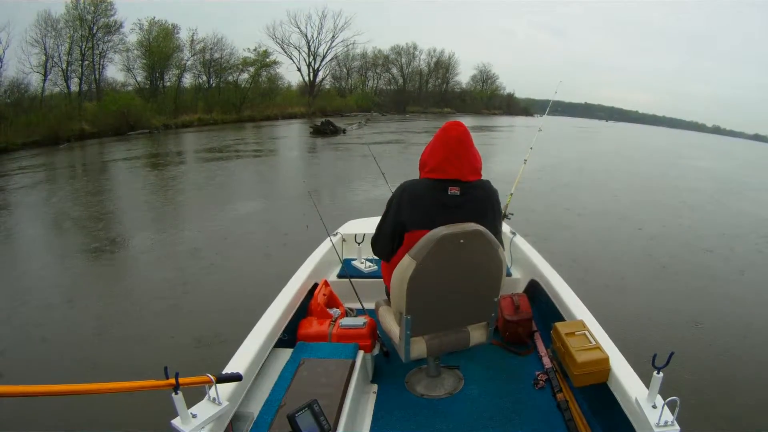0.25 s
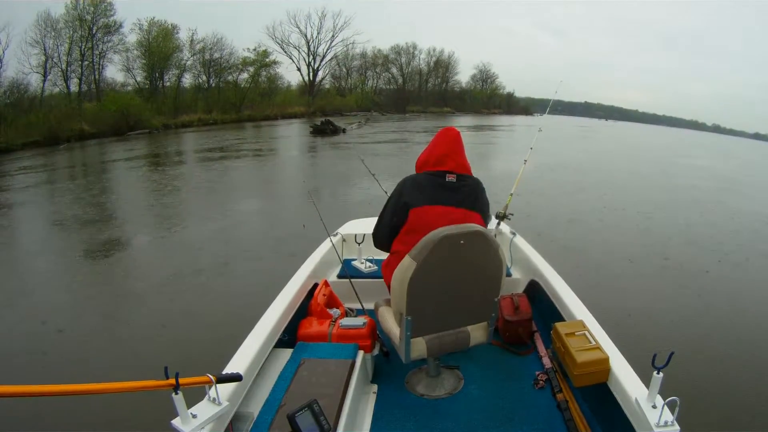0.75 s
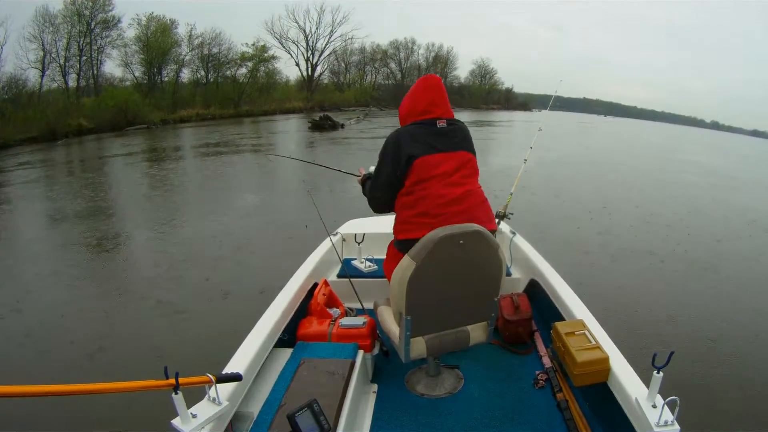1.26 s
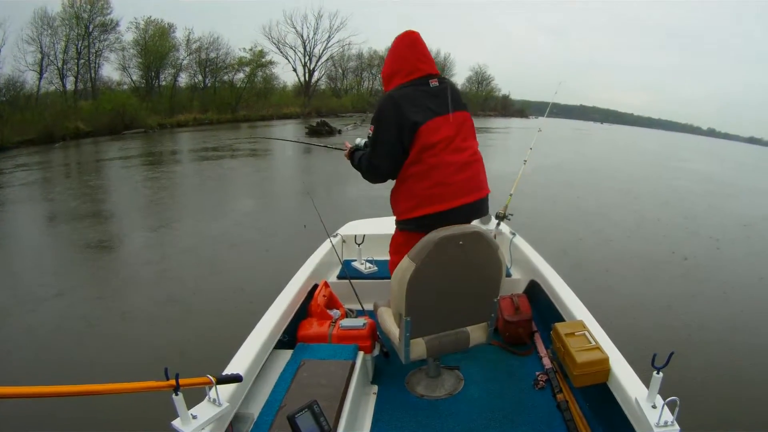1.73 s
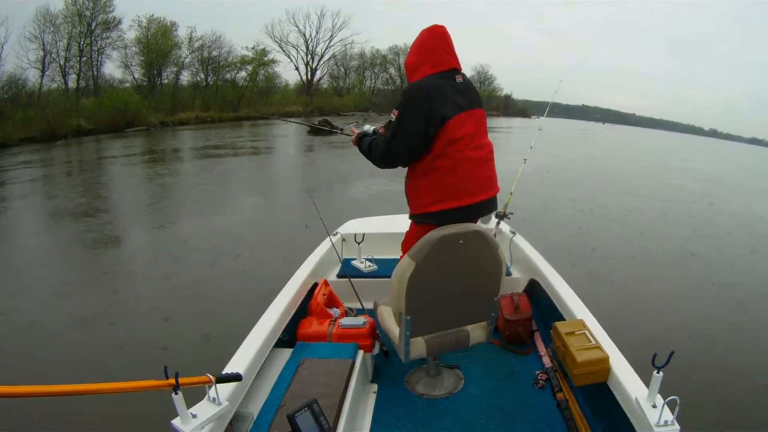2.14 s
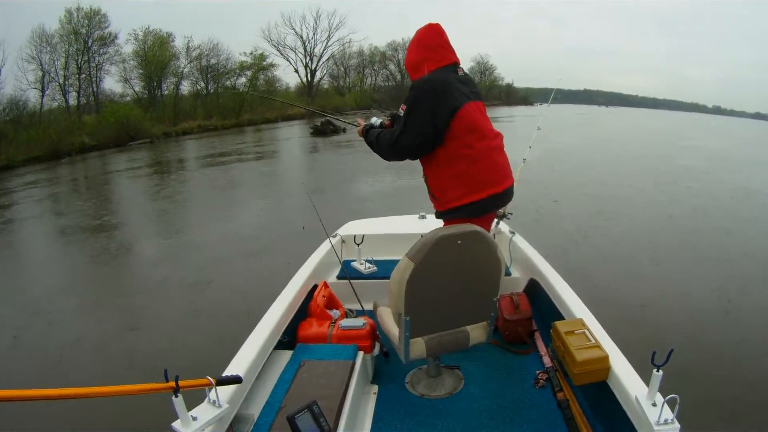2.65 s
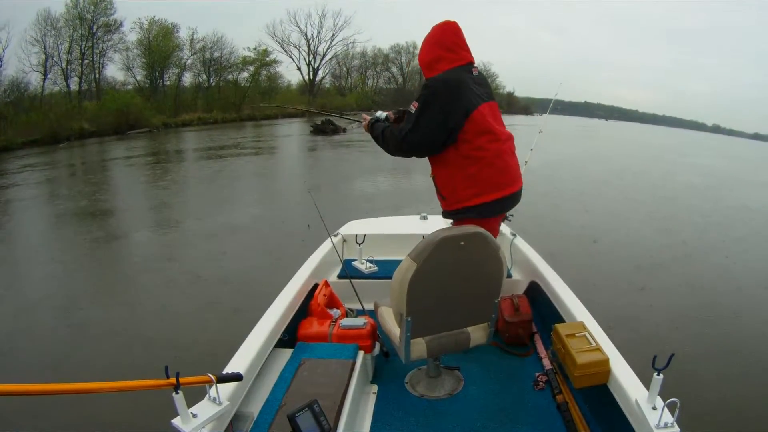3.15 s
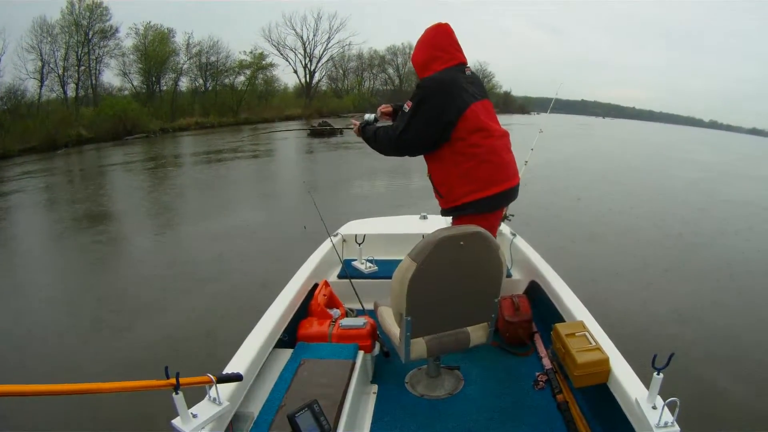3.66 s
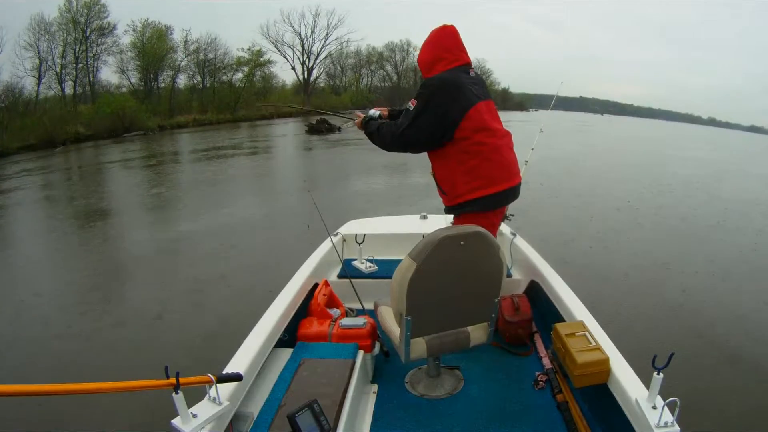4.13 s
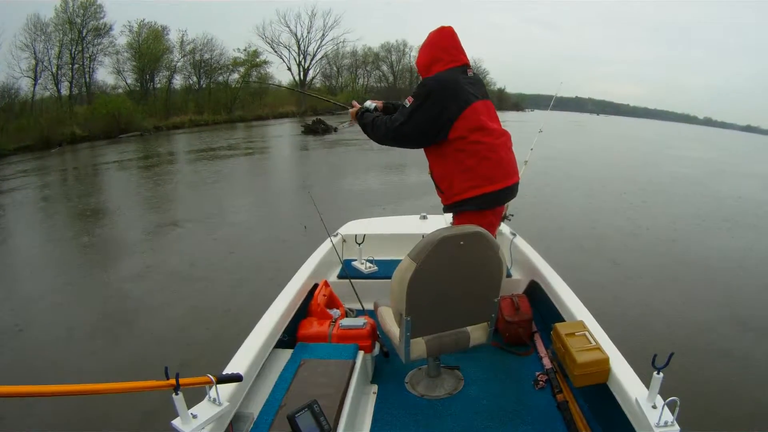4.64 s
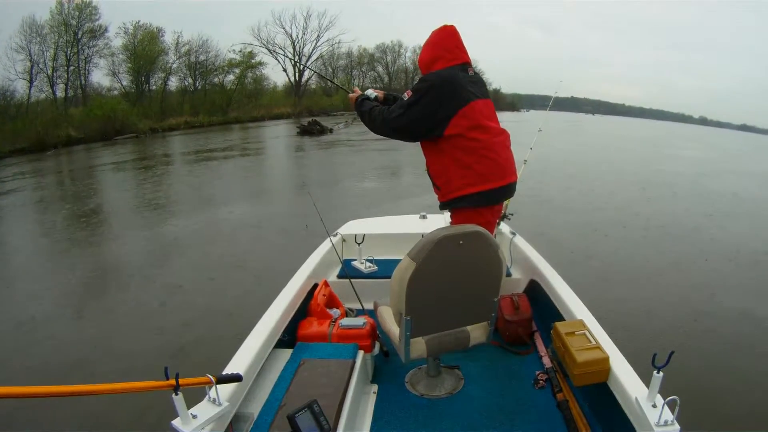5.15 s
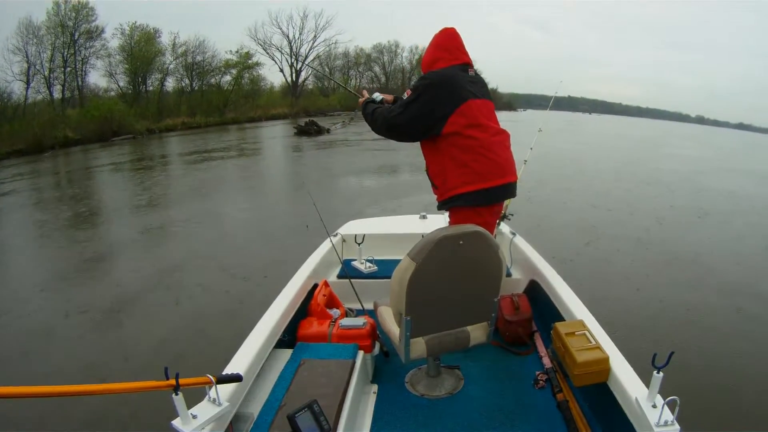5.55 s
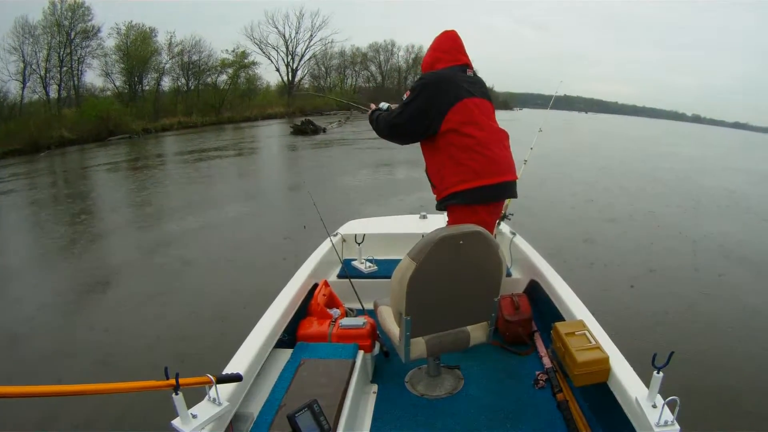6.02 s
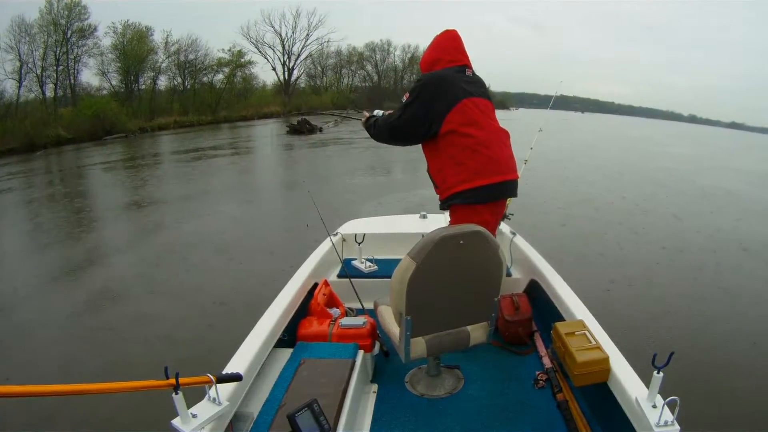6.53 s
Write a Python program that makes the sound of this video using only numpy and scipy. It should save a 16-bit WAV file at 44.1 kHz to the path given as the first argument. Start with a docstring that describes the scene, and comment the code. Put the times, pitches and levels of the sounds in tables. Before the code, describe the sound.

Steady rain on open water and a small boat, heard through a hard plastic camera housing. Low hull drumming and river hiss run throughout under a thin, rapidly pulsing whine. Drops smack the casing, tick on gear and plink in the water. An angler rises with dull bumps near one second; one violent smack follows, then a tiny squeak, a line swish and a fading electronic chirr.

```python
"""Steady rain on a river, heard from a camera in a plastic housing on a small open boat.
Throughout, filtered noise makes the boat drum and the water hiss, while the camera whines in bursts.
Single drops excite modes of the housing, tick on the gear or leave ringing bubbles in the river.
Soon an angler stands up with a few dull bumps; later come a thin squeak and the swish of a cast line.
Then a slowly fading electronic chirr sets in and lasts to the end."""
import sys
import numpy as np
from scipy import signal
from scipy.fft import rfft, irfft
from scipy.io import wavfile
from scipy.ndimage import uniform_filter1d

SR = 44100
rng = np.random.default_rng(int(sys.argv[2]) if len(sys.argv) > 2 else 0)


def wav_out(sig):
    """Save sig, one row per channel (or a flat mono array), as 16-bit PCM at SR to the path in sys.argv[1]."""
    wavfile.write(sys.argv[1], SR, np.round(np.clip(np.atleast_2d(sig).T, -1, 1) * 32767).astype(np.int16))


N = 299426
TIME = np.arange(N) / SR   # seconds

# Drumming of rain on the boat. Each row: time in seconds, level in dB before the overall trim.
DRUMMING_LEVEL = [(1.6, -33), (3.67, -35), (4.08, -33), (4.69, -36), (5.1, -32.5), (5.7, -36), (6.08, -31),
                  (6.79, -36)]
# Spectrum of the drumming boat. Each row: frequency in Hz, relative density in dB.
DRUM_SPECTRUM = [(25, -41.5), (80, -35.5), (115, -35), (160, -22), (210, -15.5), (265, -9.5), (300, -9),
                 (335, 0), (380, 2), (415, -1.5), (470, -8), (600, -15), (900, -24.5), (2000, -101)]
# Spectrum of rain on open water. Each row: frequency in Hz, relative density in dB.
RIVER_SPECTRUM = [(100, -18), (450, 2.5), (750, 3.5), (1200, 3.5), (1720, 2.5), (1820, 10.5), (1920, -0.5),
                  (2080, 5), (2450, -2), (2950, -3), (4100, -7.5), (4500, -5.5), (6300, -10), (8100, -9),
                  (8350, -37), (8700, -76)]
# Narrow hull resonances kept humming by the rain. Each row: frequency in Hz, rms level in dB
# before the band filter.
HULL_MODES = [(131, -67), (150, -63.5), (206, -54), (228, -63.5), (290, -47.5), (332, -51.5), (366, -50),
              (400, -53), (413, -47), (444, -51)]
# Modes of the housing. Each row: frequency in Hz, relative strength in dB, 60 dB decay time in seconds.
HOUSING_MODES = [(723, -16, 0.025), (960, -4.5, 0.026), (1167, -2.5, 0.018), (1538, 0.5, 0.0095),
                 (1817, -6.5, 0.025), (2025, 3, 0.012), (2584, 3.5, 0.0092), (3050, 4, 0.011),
                 (4245, -5, 0.014), (4614, -4, 0.013), (5300, 0.5, 0.0061), (6050, -9.5, 0.0096),
                 (6850, -5.5, 0.0069), (11160, -18, 0.015)]
# The loudest drops and their splashes. Each row: start in seconds, peak in dB before limiting,
# ring of the struck spot in Hz, its added strength in dB, pitch that the spot cannot excite in Hz,
# then the gains in dB of the low, middle, high and top modes.
LOUD_DROPS = [(0.0788, -11.5, 1930, 16, 1570, 7, 5, 4, 10), (0.4621, -17.5, 2680, 11, 3500, 5, -1, 4, 3),
              (0.4774, -18.5, 2090, 10, 3630, -5, -5, 3, 3),
              (.517, -20.5, 1060, -13, 3700, 7.5, -8, -2, -4),
              (.7480, -26, 1530, 8, 3500, 6, -10, -8.5, -8),
              (1.3325, 22.5, 1110, -2, 3880, -6, -2, -5, -8.5),
              (2.6958, -25, 1380, 8, 2200, 2, -2, -12, -18), (2.7018, -17.5, 3050, 8, 2010, 1, 0, -3, -16),
              (2.7074, -10.5, 740, 16, 3600, -3, -6, -5.5, -14),
              (3.0430, -16, 730, 17, 2500, 0, 3.5, 8, -17), (4.502, -16.5, 1570, 12, 2000, -6, 3, 1, 0),
              (4.572, -4.5, 5590, 5.5, 3400, -2.5, -14, 8.5, -10),
              (4.6351, -2, 755, 14.5, 5130, -6, -6, 1.5, 7),
              (5.1001, -4.5, 2500, -3, 3620, -6.5, -3, 1, 7.5),
              (6.5322, 7.5, 2660, 10, 2100, 2.5, -1.5, 2.5, 1),
              (6.6834, -15.5, 1460, 7, 2140, -7, -1, -5.5, -10)]
# Thuds of a boat panel. Each row: start in seconds, level in dB, frequency it settles to in Hz,
# octaves higher at the start.
PANEL_THUDS = [(.078, -26, 542, 0.89), (.4645, -33, 377, 0.86), (.5185, -36, 510, 0.96),
               (2.7105, -21, 440, 1.3), (3.0448, -23.5, 400, 1.53), (6.6868, -20, 374, 2)]
# Bubbles left by drops in the river. Each row: start in seconds, level in dB before the bubble and
# splash offsets, starting frequency in Hz, swell in seconds.
RIVER_PLINKS = [(.893, -27.5, 1980, 0.00073), (1.8952, -25.5, 1900, 0.00074), (2.169, -27, 1940, 0.0013),
                (2.3407, -24.5, 2080, 0.00066), (2.789, -27, 1840, .0008), (3.6533, -21, 2120, 0.0008),
                (3.7985, -28, 1460, .0028), (3.8044, -22.5, 1840, 0.0025), (4.0758, -24, 1940, 0.00049),
                (4.1872, -20.5, 1670, 0.00045), (4.4198, -28.5, 1800, .0008), (4.708, -31, 2050, 0.00087),
                (5.0457, -28, 2050, 0.0014), (5.2150, -26.5, 2080, .001), (5.351, -23.5, 1780, 0.00064),
                (5.8288, -23, 2230, 0.00091), (6.0458, -26, 2040, 0.00063), (6.1526, -24.5, 1710, 0.00098),
                (6.196, -34, 1310, 0.0028), (6.4325, -24, 1750, .0009), (6.437, -28.5, 1800, 0.0021)]
# Small splashes and slops at the hull. Each row: centre in seconds, level in dB, centre frequency
# in Hz, Gaussian half length in seconds, fall in octaves per second.
HULL_SLOPS = [(1.849, -43, 3070, .011, 16), (2.121, -36.5, 1440, .003, 80), (2.703, -26.5, 1220, 0.011, 10),
              (2.959, -32.5, 1100, 0.012, 35), (3.786, -28.5, 800, .0035, 110),
              (6.696, -33.5, 1120, 0.0065, 60)]
# Light ticks on rods and fittings. Each row: start in seconds, level in dB before trim and band filter.
GEAR_TICKS = [(0.313, -24.5), (1.446, -25), (1.815, -26), (1.839, -28), (2.017, -33), (2.1184, -31),
              (2.34, -28), (2.385, -23), (2.587, -25), (2.816, -21), (2.996, -25), (3.095, -25),
              (3.694, -22.5), (3.996, -24), (6.158, -31), (6.329, -30), (6.5575, -31)]
# Spectrum of ticks and prickle. Each row: frequency in Hz, relative density in dB.
TICK_SPECTRUM = [(1500, -48), (3000, 9.5), (3800, 0.5), (4700, 8.5), (6500, 8.5), (8000, -41),
                 (10000, -107)]
# Bumps on the deck as the angler rises and shifts. Each row: start in seconds, level in dB,
# frequency in Hz.
DECK_BUMPS = [(0.873, -17.5, 362), (0.903, -18.5, 377), (0.929, -20.5, 325), (1.001, -24, 498)]
# Spectrum of the swishing line. Each row: frequency in Hz, relative density in dB.
LINE_SPECTRUM = [(2500, -10), (4500, 5), (5800, 9), (7100, 0), (8000, 1), (9000, -50), (11000, -4),
                 (15000, -20)]
# Spectrum of the electronic chirr. Each row: frequency in Hz, relative density in dB.
CHIRR_SPECTRUM = [(2500, -1), (4500, -2), (5800, -4), (7100, 9.5), (8000, -4), (9000, -61), (10300, -10),
                  (11400, 2.5), (12500, -8), (15000, -23)]
# Steady electronic tones. Each row: frequency in Hz, rms level in dB.
STEADY_TONES = [(7838, -72), (7897, -75), (8360, -73), (11149, -73)]
# Spectrum of microphone hiss. Each row: frequency in Hz, relative density in dB.
HISS_SPECTRUM = [(9200, -31), (10000, -3.5), (10900, -2), (11300, 3), (11900, 0), (12500, 0.5),
                 (13100, 5.5), (13900, 1), (14900, 5), (15300, 2)]

RIVER_DB = -42.5
BUBBLE_RISE_OCTAVES_PER_S = 54
THUD_SWELL_S, THUD_SETTLE_S = 0.004, 0.0033
CAST_S, CAST_HALF_S, CAST_DB = 2.29, 0.081, -46.5
FRAME_HZ = 29.97
# the chirr: a beat of three frames, in a loop of sixteen beats with five rests
CHIRR_START_S, CHIRR_HALF_S, CHIRR_DB, CHIRR_FADE_DB_PER_S = 3.117, 0.023, -48.5, 1.2
BEAT_FRAMES, LOOP_BEATS, RESTS = 3, 16, (1, 5, 8, 11, 14)
CUTOFF_HZ = 15280


def from_db(db):
    """Amplitude ratio: twenty decibels are a factor of ten."""
    return 10 ** (np.asarray(db) / 20)


def rms_one(x):
    """Normalisation of power: scale to rms 1."""
    return x / np.sqrt(np.mean(x ** 2) + 1e-20)


def peak_one(x):
    """Normalisation of amplitude: scale to peak 1."""
    return x / (np.abs(x).max() + 1e-20)


def add(out, s, sound):
    """Superposition: mix a short sound in from a given second."""
    start = max(0, round(s * SR))
    out[start:start + len(sound)] += sound[:max(0, N - start)]


def band(x, low_hz, high_hz, order=2):
    """Band-pass filtering: keep the energy between two frequencies."""
    edges = [low_hz, min(high_hz, .45 * SR)]
    return signal.sosfilt(signal.butter(order, edges, "band", fs=SR, output="sos"), x)


def noise(spectrum, size=N):
    """Spectral shaping: white noise weighted in frequency, rms 1."""
    hz, level_db = np.transpose(spectrum)
    log_hz = np.log(np.maximum(np.fft.rfftfreq(size, 1 / SR), 1))
    gain = from_db(np.interp(log_hz, np.log(hz), level_db))
    white = rng.standard_normal(size)
    return rms_one(irfft(rfft(white) * gain, size))


def ring(force, hz, t60):
    """Damped resonance: a unit impulse starts a decaying sine of height 1."""
    r, w = from_db(-60 / (t60 * SR)), 2 * np.pi * hz / SR
    return signal.lfilter([0, np.sin(w)], [1, -2 * r * np.cos(w), r * r], force + 1e-18)


def swell(centre_s, half_s, order=2):
    """Smooth envelope: a rise and fall, flatter on top at a higher order."""
    return np.exp(-.5 * np.minimum(np.abs(TIME - centre_s) / half_s, 10) ** order)


def rainfall(per_s, spread_db):
    """Random arrivals: independent impacts of either sign, many small and a few large."""
    sizes = from_db(spread_db * np.minimum(rng.exponential(1, N), 4))
    return sizes * rng.choice([-1, 1], N) * (rng.random(N) < per_s / SR)


def bubble(level_db, hz, swell_s, octaves_per_s):
    """Bubble resonance: trapped air rings briefly, rising in pitch as it nears the surface."""
    t = TIME[:SR // 40]
    phase = 2 * np.pi * np.cumsum(hz * 2 ** (octaves_per_s * t)) / SR
    envelope = peak_one(t * np.exp(-.5 * (t / swell_s) ** 2))
    return from_db(level_db) * envelope * np.sin(phase)


def steady_rain(drum_db, patter_db, prickle_db, hull_t60):
    """Random superposition: far drops merge into drumming and hiss; nearer ones patter and prickle."""
    impacts = rainfall(per_s=210, spread_db=3.5)
    patter = np.zeros(N)
    for hz, db, t60 in HOUSING_MODES:
        strikes = impacts * rng.uniform(-1.02, 1, N)   # each drop drives each mode differently
        patter += from_db(db) * ring(strikes, hz, t60)
    patter = band(patter, 370, 2300)

    tiny_impacts = np.abs(rainfall(per_s=55, spread_db=0.8))
    spray = signal.lfilter([1], [1, -np.exp(-1 / (0.0012 * SR))], tiny_impacts + 1e-18)   # 1.2 ms decay
    prickle = band(spray * noise(TICK_SPECTRUM), 2340, 6500, order=4)
    water = noise(RIVER_SPECTRUM)
    water = water + from_db(patter_db) * rms_one(patter) + from_db(prickle_db) * rms_one(prickle)

    s, level_db = np.transpose(DRUMMING_LEVEL)
    boat = from_db(drum_db + np.interp(TIME, s, level_db)) * noise(DRUM_SPECTRUM)
    hum = np.zeros(N)
    for hz, db in HULL_MODES:
        mode = np.diff(ring(rng.standard_normal(N + 1), hz, hull_t60))
        hum += from_db(db) * rms_one(mode)
    return boat + from_db(RIVER_DB) * water + band(hum, 90, 880)


def near_drops(splash_s, spatter_db, spot_q, node_q, low_cut_hz, high_cut_hz):
    """Modal excitation: where a drop strikes and spatters decides which housing modes ring most."""
    out, t = np.zeros(N), TIME[:SR // 12]
    for s, peak_db, spot_hz, spot_db, node_hz, low_db, middle_db, high_db, top_db in LOUD_DROPS:
        force = from_db(spatter_db) * rng.standard_normal(len(t)) * np.exp(-t / splash_s)
        force[0] += 1
        place_hz = [1300, 1800, 2100, 2900, 4200, 5200, 6000]
        place_gains = [low_db, 0, 0, middle_db, high_db, high_db, top_db]
        smack = np.zeros(len(t))
        for k, (hz, db, t60) in enumerate(HOUSING_MODES):
            gain = from_db(db + np.interp(hz, place_hz, place_gains))
            smack += (-1) ** k * gain * ring(force, hz, t60)   # neighbouring modes swing oppositely
        spot = signal.lfilter(*signal.iirpeak(spot_hz, spot_q, fs=SR), smack)
        smack = smack + from_db(spot_db) * spot
        # the struck spot lies on a node of this pitch
        smack = signal.lfilter(*signal.iirnotch(node_hz, node_q, fs=SR), smack)
        # a small shell gives no bass, a soft drop no top
        smack = band(smack, low_cut_hz, high_cut_hz, order=4)
        add(out, s, from_db(peak_db) * peak_one(smack))
    return out


def thuds():
    """Dispersion: a heavy drop's blow spreads through a panel highs first, so the pitch falls."""
    out, t = np.zeros(N), TIME[:SR // 20]
    envelope = peak_one(t * np.exp(-.5 * (t / THUD_SWELL_S) ** 2))
    for s, level_db, hz, octaves in PANEL_THUDS:
        pitch = hz * 2 ** (octaves * np.exp(-t / THUD_SETTLE_S))
        phase = 2 * np.pi * np.cumsum(pitch) / SR
        add(out, s, from_db(level_db) * envelope * np.sin(phase))
    return out


def plinks(bubble_db, splash_db, splash_s):
    """Impact and resonance: each drop splashes as a noise burst and leaves a ringing bubble."""
    out, t = np.zeros(N), TIME[:SR // 40]
    for s, level_db, hz, swell_s in RIVER_PLINKS:
        burst = rng.standard_normal(len(t)) * np.exp(-t / splash_s)
        splash = from_db(level_db + splash_db) * peak_one(band(burst, hz / 2, hz * 1.63, order=5))
        add(out, s, splash + bubble(level_db + bubble_db, hz, swell_s, BUBBLE_RISE_OCTAVES_PER_S))
    return out


def far_plops(count, level_db, spread_db, low_hz, high_hz, swell_s):
    """Bubble resonance at random: drops further out leave soft bubbles of many sizes."""
    out = np.zeros(N)
    for when, size, softness in rng.random((count, 3)):
        hz = low_hz * (high_hz / low_hz) ** size
        plop = bubble(level_db - spread_db * softness, hz, swell_s, BUBBLE_RISE_OCTAVES_PER_S)
        add(out, when * TIME[-1], plop)
    return out


def slops(droplets_per_s):
    """Clustered impacts: water hits the hull as droplets, the fine bright ones first."""
    out, t = np.zeros(N), TIME[:SR // 10] - .05
    for s, db, hz, half_s, fall in HULL_SLOPS:
        impacts = rainfall(per_s=droplets_per_s, spread_db=0.0)[:SR]
        droplets = rms_one(band(impacts, hz / 2, hz * 1.43, order=3))
        place = np.cumsum(2 ** np.clip(-fall * t, -2, 2))   # reading ever slower lowers the pitch
        slop = np.interp(place, np.arange(SR), droplets)
        add(out, s + t[0], from_db(db) * np.exp(-.5 * (t / half_s) ** 2) * slop)
    return out


def ticks(trim_db, decay_s):
    """Short impact: drops on small hard things sound bright and are over at once."""
    out, t = np.zeros(N), TIME[:SR // 20]
    for s, level_db in GEAR_TICKS:
        tick = noise(TICK_SPECTRUM, size=len(t)) * np.exp(-t / decay_s)
        add(out, s, from_db(level_db + trim_db) * peak_one(tick))
    return band(out, 1400, 5640, order=5)


def fitting(s, hz, level_db, width_hz, buzz_db, decay_s):
    """Sustained resonance: a metal fitting, struck once, holds a buzzing note and then dies."""
    out, t = np.zeros(N), TIME[:SR // 2]
    buzz = rms_one(band(rng.standard_normal(len(t)), hz - width_hz / 2, hz + width_hz / 2))
    note = np.sin(2 * np.pi * hz * t) + from_db(buzz_db) * buzz
    add(out, s, from_db(level_db) * note * np.exp(-(t / decay_s) ** 3))
    return out


def bumps(swell_s, rumble_db, rumble_s):
    """Cavity excitation: a soft push on the deck makes the hollow boat boom and rumble briefly."""
    out, t = np.zeros(N), TIME[:SR // 5]
    push = peak_one(t * np.exp(-t / swell_s))
    rumble_swell = peak_one(t * np.exp(-t / rumble_s))
    for s, level_db, hz in DECK_BUMPS:
        boom = push * np.sin(2 * np.pi * hz * t)
        rumble = from_db(rumble_db) * noise(DRUM_SPECTRUM, size=len(t)) * rumble_swell
        add(out, s, from_db(level_db) * (boom + rumble))
    return out


def cast():
    """Broadband friction noise: line swishes off the spool."""
    return from_db(CAST_DB) * swell(CAST_S, CAST_HALF_S, order=4) * noise(LINE_SPECTRUM)


def thin_note(s, length_s, hz, level_db, octave_db, waver):
    """Frequency modulation: a short squeak and its octave waver by a random fraction of the pitch."""
    t = TIME[:int(length_s * SR)]
    drift = rms_one(uniform_filter1d(rng.standard_normal(len(t)), size=120))
    phase = 2 * np.pi * np.cumsum(hz * (1 + waver * drift)) / SR
    note = np.sin(phase) + from_db(octave_db) * np.sin(2 * phase)
    out = np.zeros(N)
    add(out, s, from_db(level_db) * signal.windows.tukey(len(t), .5) * note)
    return out


def chirr():
    """Amplitude modulation: bursts of electronic fizz keep step with the frames and slowly fade."""
    beat_s = BEAT_FRAMES / FRAME_HZ
    beats = int((TIME[-1] - CHIRR_START_S) / beat_s) + 1
    bursts = np.zeros(N)
    for k in range(beats):
        if k % LOOP_BEATS not in RESTS:
            s = k * beat_s
            level = from_db(CHIRR_DB - CHIRR_FADE_DB_PER_S * s)
            bursts += level * swell(CHIRR_START_S + s, CHIRR_HALF_S, order=4)
    return bursts * noise(CHIRR_SPECTRUM)


def camera(whine_db, whine_hz, overshoot_hz, settle_s, idle_db, uneven_db, gap_db, jitter_rad, hiss_db):
    """Periodic modulation: the electronics whine once a frame, starting sharp, weaker every eighth."""
    frame, since = np.divmod(TIME - .0167, 1 / FRAME_HZ)   # frame number, seconds into the frame
    slow_spectrum = [(30, 0), (100, -6), (400, -50)]
    load_db = np.where(frame % 8 == 6, idle_db, 0) + uneven_db * noise(slow_spectrum)
    load = from_db(load_db + gap_db * (since > .0267))   # weaker late in each frame
    busy = uniform_filter1d(uniform_filter1d(load, size=24), size=24)
    phase = 2 * np.pi * (whine_hz * since + overshoot_hz * np.minimum(since, settle_s))
    phase = phase + jitter_rad * noise(slow_spectrum)
    whine = from_db(whine_db) * busy * np.sin(phase)
    tones = sum(from_db(db) * np.sqrt(2) * np.sin(2 * np.pi * hz * TIME) for hz, db in STEADY_TONES)
    return whine + tones + from_db(hiss_db) * noise(HISS_SPECTRUM)


def scene():
    """Superposition: rain, boat, tackle and camera add at one microphone."""
    rain = steady_rain(drum_db=-0.8, patter_db=-7, prickle_db=-11, hull_t60=0.41)
    drops = near_drops(splash_s=0.0035, spatter_db=-36.5, spot_q=12.0, node_q=7.9,
                       low_cut_hz=240, high_cut_hz=8600)
    drops = drops + thuds()
    water = plinks(bubble_db=0.5, splash_db=-9, splash_s=0.0025)
    water = water + far_plops(count=150, level_db=-31.0, spread_db=13,
                              low_hz=685, high_hz=2480, swell_s=0.0012)
    water = water + slops(droplets_per_s=4400)
    gear = ticks(trim_db=1.0, decay_s=0.0014)
    gear = gear + fitting(s=0.086, hz=2040, level_db=-41, width_hz=160, buzz_db=-2.0, decay_s=0.13)
    angler = bumps(swell_s=0.0051, rumble_db=-10.0, rumble_s=0.015) + cast()
    squeak = thin_note(s=1.688, length_s=0.061, hz=7500, level_db=-38.0, octave_db=-6, waver=0.0062)
    electronics = chirr() + camera(whine_db=-43, whine_hz=5188, overshoot_hz=235, settle_s=0.0035,
                                   idle_db=-7.5, uneven_db=1.0, gap_db=-9, jitter_rad=0.48,
                                   hiss_db=-52.0)
    return (rain + drops + water + gear + angler + squeak + electronics)[None]


def record(dry, ceiling_db=-1.0, attack_db_per_s=390, release_db_per_s=900):
    """Gain control: a look-ahead limiter ducks all around the hardest drops, then the top is cut."""
    over_db = np.maximum(20 * np.log10(np.abs(dry[0]) + 1e-9) - ceiling_db, 0)
    attack_ramp, release_ramp = attack_db_per_s * TIME, release_db_per_s * TIME
    # scanned backwards, so that the gain is already falling ahead of each peak
    ahead_db = np.maximum.accumulate((over_db - attack_ramp)[::-1])[::-1] + attack_ramp
    duck_db = np.maximum.accumulate(ahead_db + release_ramp) - release_ramp
    low_pass = signal.ellip(10, .1, 70, CUTOFF_HZ, fs=SR, output="sos")
    return signal.sosfilt(low_pass, dry * from_db(-duck_db))


dry = scene()
out = record(dry)
wav_out(out)
```